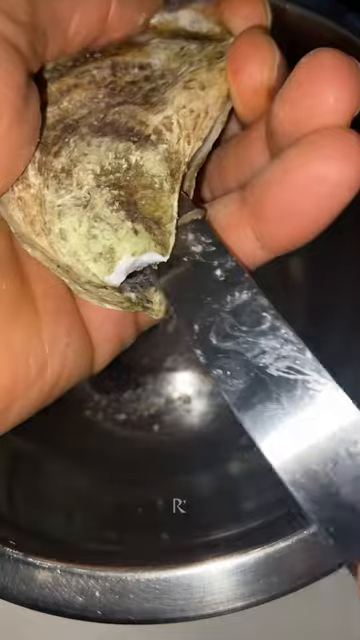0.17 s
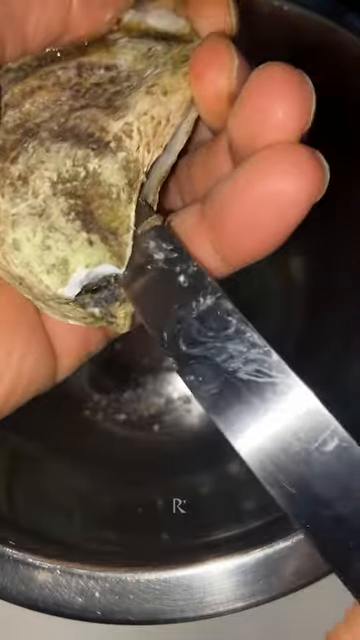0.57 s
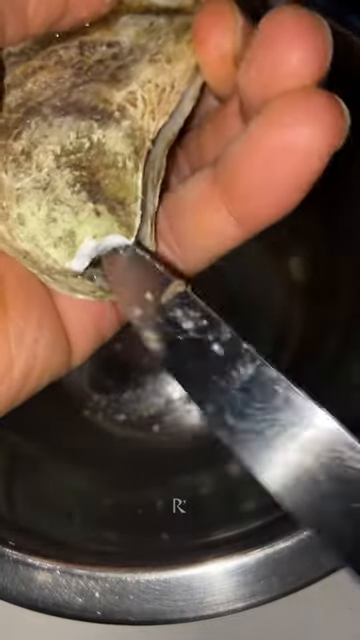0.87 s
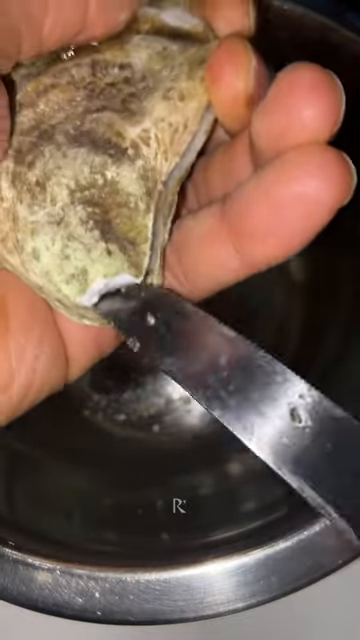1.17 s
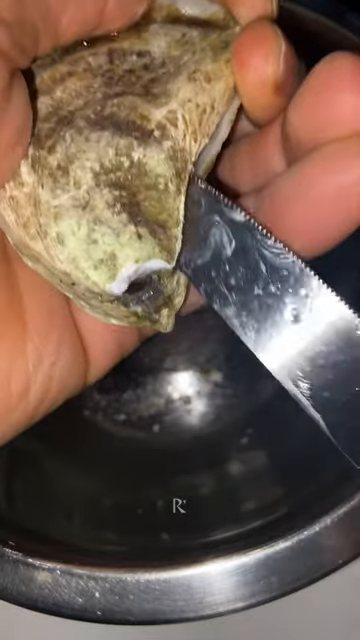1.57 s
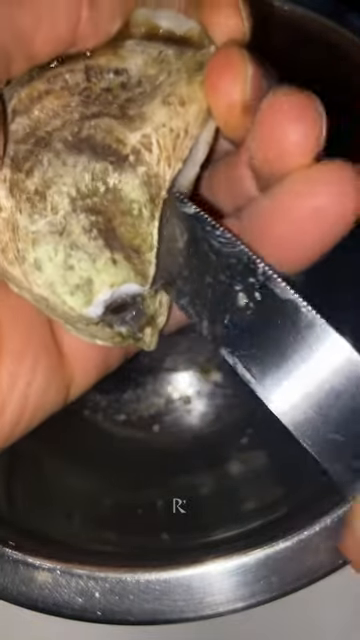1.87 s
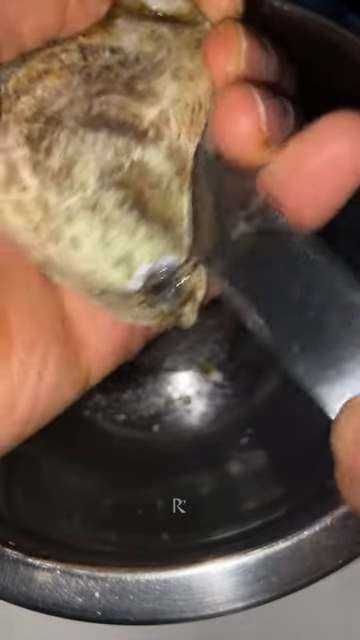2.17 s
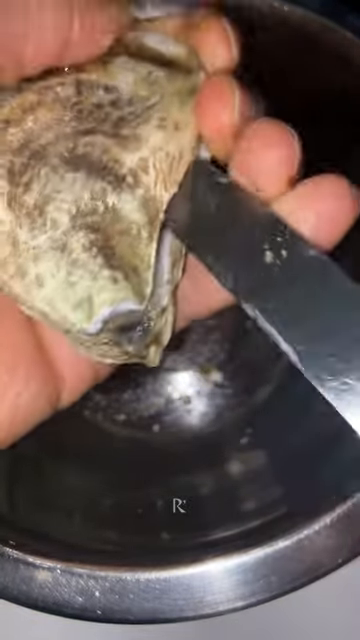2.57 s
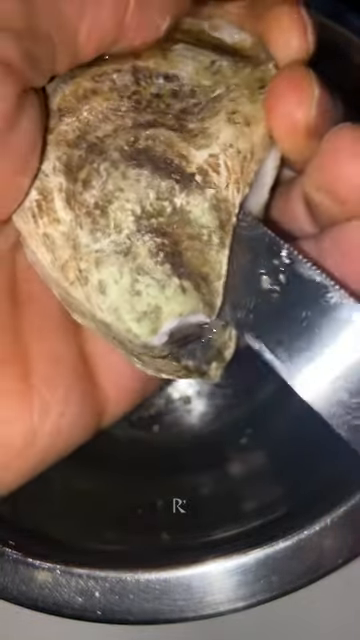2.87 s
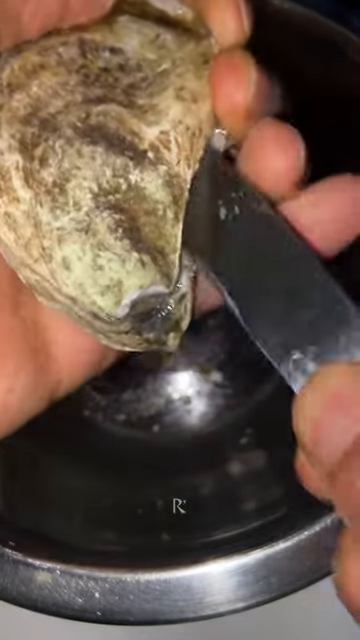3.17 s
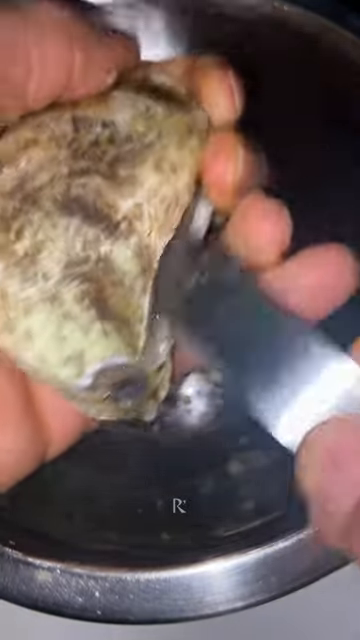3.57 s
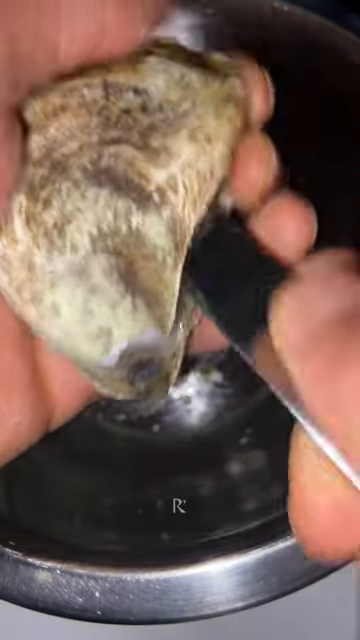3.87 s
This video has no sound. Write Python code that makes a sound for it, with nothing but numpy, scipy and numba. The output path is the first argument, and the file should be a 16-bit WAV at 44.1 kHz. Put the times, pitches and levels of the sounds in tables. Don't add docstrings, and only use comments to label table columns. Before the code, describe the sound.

Close phone pickup of an oyster being shucked over a metal bowl indoors; brittle clicks and short gritty blade scrapes come unevenly, denser and louder later, with a brief diffuse tail and quiet hiss.

```python
import sys
import numpy as np
from scipy import signal
from scipy.fft import rfft, irfft
from scipy.io import wavfile
from numba import njit

SR = 44100
rng = np.random.default_rng(int(sys.argv[2]) if len(sys.argv) > 2 else 0)


def makeup_ratio(level_db):
    decades = np.asarray(level_db, float) / 20
    return 10 ** decades


def put_to_file(sound):
    columns = np.atleast_2d(sound).T
    safe = np.clip(columns, -1, 1)
    whole_steps = np.round(safe * 32767)
    wavfile.write(sys.argv[1], SR, whole_steps.astype(np.int16))


N = 176400

# f/Hz, density/dB per Hz
RUMBLE = [(12, -62), (20, -23.5), (44, 2), (123, 5.5), (145, -19), (211, -3), (242, -14), (296, -7),
          (400, -26.5), (520, -61), (880, -120)]
AIR = [(240, 7), (400, -5), (512, -7), (666, -6), (753, -15), (1400, -16), (1760, -24), (16000, -48)]
RUMBLE_DB, AIR_DB, AIR_SIDE_DB = -44, -60, 0.5

# t/s, length/s, start level/dB, end level/dB, shell against treble/dB
SLIDES = [(0, 0.085, -90, -81, -10), (0.328, 0.08, -72, -63, -8), (0.531, 0.018, -55.5, -46, -7),
          (0.546, 0.079, -57, -49, 0.5), (0.644, 0.028, -58.5, -59, 4),
          (0.711, 0.26, -58.5, -83, 0.5), (0.883, 0.11, -35.5, -72, 3),
          (0.99, 0.09, -42.5, -50.5, 4.5), (1.055, 0.03, -48, -25.5, -5),
          (1.072, 0.019, -16, -42.5, 0), (1.094, 0.084, -50.5, -49.5, 0.5),
          (1.341, 0.025, -53.5, -50, 2), (1.493, 0.091, -48, -60, 0.5), (1.625, 0.11, -58.5, -37, -1),
          (1.787, 0.073, -56, -32, -0.5), (1.854, 0.033, -40, -55, 0), (1.918, 0.12, -45, -29, 3.5),
          (2.004, 0.14, -40, -42.5, 2), (2.156, 0.093, -70, -57, 3.5),
          (2.23, 0.16, -44, -54.5, -1), (2.462, 0.0099, -32, -29.5, 0), (2.507, 0.082, -86, -49, -5.5),
               (2.602, 0.052, -32, -43.5, -2.5), (2.717, 0.083, -52, -38.5, 1), (2.882, 0.023, -39, -36, 2),
               (2.913, 0.13, -46.5, -50, 1), (3.023, 0.019, -46.5, -27.5, 1.5), (3.05, .11, -90, -55, -1.5),
               (3.201, 0.091, -49.5, -40.5, 1), (3.294, 0.17, -52, -50, 9), (3.379, 0.047, -30, -35.5, 1.5),
               (3.43, 0.017, -36.5, -23.5, -2), (3.459, 0.23, -63.5, -59, 2.5),
               (3.619, 0.15, -36.5, -58, 1), (3.714, .15, -63, -52, 0.5), (3.856, 0.045, -68, -59, -4.5),
               (3.897, 0.095, -52.5, -36.5, -5), (3.974, 0.02, -39, -58, 2)]
SLIDE_EDGE_S, LIFT_S = 0.012, 0.0028
REST_DB, REST_FROM_S = -76, 0.5
GRIT_PER_S, GRIT_SPREAD_DB, FLUTTER_DB = 8000, 3.0, 3
GRIND_DB, GRIND_THUD_DB, GRIND_SHELL_DB, GRIND_TREBLE_DB = -22.5, 9.5, -2, 1.5
WANDER_DB, WANDER_PER_S = 5.5, 7

# t/s, peak level/dB, shell share/dB, treble share/dB
SNAGS = [(0.2575, -50.5, -6, 10), (0.5479, -26.5, -27, 6), (0.5673, -22, 1.5, -34),
         (0.609, -18.5, 7, -5), (0.7307, -36, 0.5, -1), (0.8885, -22.5, -14, 7.5),
         (0.9124, -23, -1, 5), (1.017, -14.5, 2.5, -38), (1.0714, -9, -4, -24.5), (1.0806, 0, 3, -5),
         (1.3572, -24.5, -16, -5), (1.9424, -18.5, -1, -11), (2.2383, -24, -6, 3),
         (2.2804, -12.5, 6, 0), (2.3031, -19.5, -6, 1), (2.3462, -17.5, -3, 1), (2.382, -18, -0.5, 0),
         (2.4722, -9, -2.5, -7), (2.5139, -28, 8, -5), (2.5332, -9.5, -3, -6), (2.6184, -6.5, -4.5, 3),
              (2.643, -12.5, 3, -22), (2.8765, -30, -1, 4), (2.8903, -16, -1, 0.5), (3.0385, -14, 4.5, 5.5),
              (3.0718, -24, 8.5, 6), (3.1135, -36.5, 5.5, 22), (3.27, -6.5, 2, -7), (3.3179, 5, -8.5, -10),
              (3.3877, -7, 9, -2), (3.4351, -26, 10, 13), (3.4462, -4, 3, 5.5), (3.6177, 2, -1.5, 0),
              (3.651, 1.5, -1.5, 6.5), (3.8607, 3, -12, -5.5), (3.9828, -10, -1, -7.5)]
# t/s, peak level/dB, shell share/dB, treble share/dB
TICKS = [(0.3229, -46.5, -11, 4), (0.6595, -39.5, 1, -14), (0.878, -37, -16, -3), (0.9688, -38, 6, 2),
         (1.003, -28.5, 7, -21), (1.0315, -33, 5, -9), (1.1398, -37, 0, -3.5), (1.4442, -43.5, -8, 3),
         (1.8073, -43, 0, 2), (1.8196, -28, 3.5, 0), (2.199, -37, 0.5, -5), (2.264, -23, -5, 9),
         (2.719, -41, 15, 4), (2.7459, -33, -11, 12), (2.8054, -35, -10, -5), (2.862, -48, -9, -3),
         (3.0274, -37, 16, 21), (3.0451, -32.5, 2, 12), (3.1475, -40.5, 11, 4), (3.2131, -27, -8, 8),
         (3.2229, -37, 10, 16), (3.2466, -23.5, -10, -4), (3.4038, -18, 2, 11.5), (3.5783, -39, 3.5, -2),
         (3.6346, -13, -36, -3)]
# t/s, peak level/dB
TEETH = [(1.9817, -18), (1.9913, -4.5), (2, -9.5), (2.0098, -12), (2.0203, -22), (2.0334, -22),
         (2.047, -12), (2.0531, -14.5), (2.0713, -22), (2.08, -10.5), (2.0912, -12), (2.111, -15),
         (2.1305, -6.5)]
CHIP_S, TOOTH_S, CHIP_RISE_S = 0.0022, 0.0005, 0.0006
SNAG_GAIN_DB, CHIP_SCATTER_DB = -13.5, 2.5

# f/Hz, level/dB, t60/s
THUD = [(540, -23, 0.0046), (1200, -14.5, 0.0014)]
SHELL = [(1850, -15.5, 0.02), (1971, 1, 0.025), (2320, -3, 0.018), (2800, -4.5, 0.014)]
BLADE = [(2926, -11, 0.012), (3658, -1.5, 0.01), (4170, -7, 0.011), (4750, 0, 0.0031), (5330, 0, 0.0027),
         (6030, -8.5, 0.0044)]
TREBLE = [(7000, -8.5, 0.0058), (7960, 1.5, 0.0011), (9400, -1.5, 0.0018), (10650, -10, 0.0019),
          (10240, -11.5, 0.001), (11800, -12, .003), (12240, -7, .003), (14400, -10.5, 0.0024),
          (15500, -9, .003)]
BEND_SHARES = [.05, .025, .03, .04]
BEND_PER_S = 4
LEAST_T60_S, GRIP_T60_S, BODY_CUT_HZ = 0.0055, 0.02, 1630
# t/s, lean/dB per octave
CONTACT = [(0, 0), (1.1, -7), (2.1, -5.5), (2.9, -1.5), (3.4, 8.5), (4, 20.5)]
BLADE_MIDDLE_HZ = 4300

# t/s, peak level/dB, f/Hz, t60/s
KNOCKS = [(.572, -37.5, 766, 0.021), (.61, -33.5, 1390, 0.0051), (.889, -24, 1850, 0.049),
          (0.893, -33.5, 1265, 0.02), (0.895, -29, 413, 0.0071), (1.019, -38, 980, 0.0062),
          (1.08, -40.5, 1200, 0.03), (1.142, -41, 616, 0.0039), (1.358, -46.5, 702, 0.0052),
          (2.471, -42.5, 574, 0.0046), (2.535, -35, 950, 0.0031), (2.62, -38, 445, 0.0091),
          (2.645, -35.5, 428, 0.01), (3.04, -38.5, 1340, 0.0061), (3.321, -31, 540, 0.011),
          (3.324, -35, 1160, 0.025), (3.391, -40, 1200, 0.014), (3.447, -42.5, 1060, 0.026),
          (3.62, -46, 1450, 0.018), (3.653, -35, 1280, 0.0085), (3.679, -50, 770, 0.038),
          (3.704, -53, 900, 0.044), (3.782, -55, 1270, 0.018), (3.862, -37.5, 700, 0.011),
          (3.86, -32, 1060, 0.0096), (3.983, -30, 1560, 0.026)]
KNOCK_CRUMBLE_S = 0.0023

BOWL_T60_S, BOWL_DB, BOWL_SIDE_DB = 0.064, -15.5, 1.5
# f/Hz, lead/rad
PORT_LEAD = [(1900, 0), (3050, 1.25), (3450, .15), (4900, .1), (6000, 1.1), (6800, 2.85), (8000, 3.45),
             (8900, 5.2), (10300, 6.28), (12000, 7.2), (12800, 9.1), (14200, 9.75), (15200, 11.4),
             (15900, 12.5)]
# f/Hz, level/dB
PORT_DB = [(1900, 0), (2750, -10), (3450, 4), (4200, -4), (4800, 0)]
TOP_HZ = 16400


def rms_one(x):
    return x / np.sqrt(np.mean(x ** 2) + 1e-20)


def drift(rate):
    r = np.exp(-64 * np.pi * rate / SR)
    slow = signal.lfilter([1], [1, -2 * r, r * r], rng.standard_normal(N // 32 + 1002))[1000:]
    return np.interp(np.arange(N) / 32, np.arange(len(slow)), rms_one(slow))


def coloured(spectrum):
    hz, db = np.transpose(spectrum)
    f = np.fft.rfftfreq(N, 1 / SR) + 1
    gain = makeup_ratio(np.interp(np.log(f), np.log(hz), db, -90, -90))
    return rms_one(irfft(rfft(rng.standard_normal(N)) * gain, N))


@njit
def ring(force, turn, r):
    out = np.zeros(len(force))
    for i in range(2, len(force)):
        kept = 2 * r * np.cos(turn[i]) * out[i - 1] - r * r * out[i - 2]
        out[i] = np.sin(turn[i]) * force[i - 1] + kept + 1e-18
    return out


def mode(force, hz, t60):
    turn = 2 * np.pi * hz / SR * np.ones(len(force))
    return ring(force, turn, float(makeup_ratio(-60 / (t60 * SR))))


def bodies():
    return [(g, *m) for g, group in enumerate([THUD, SHELL, BLADE, TREBLE]) for m in group]


def rumble():
    return makeup_ratio(RUMBLE_DB) * coloured(RUMBLE)


def air():
    no_bass = signal.butter(4, 450, "high", fs=SR, output="sos")
    side = makeup_ratio(AIR_DB + AIR_SIDE_DB) * signal.sosfilt(no_bass, coloured(AIR))
    middle = makeup_ratio(AIR_DB) * coloured(AIR)
    return middle, side


def pressure():
    t, power = np.arange(N) / SR, np.zeros((3, N))
    for s, length, db0, db1, tilt_db in SLIDES:
        near = slice(max(int((s - SLIDE_EDGE_S) * SR), 0), int((s + length + SLIDE_EDGE_S) * SR))
        inside = np.minimum(t[near] - s, s + length - t[near])
        edge = np.clip(inside / SLIDE_EDGE_S + 0.5, 0, 1)
        level = makeup_ratio(np.interp(t[near], [s, s + length], [db0, db1]))
        tilt = makeup_ratio(tilt_db * np.array([[1], [0], [-1]]))
        power[:, near] += (edge * level * tilt) ** 2
    fade = np.exp(-1 / (LIFT_S * SR))
    resting = makeup_ratio(2 * REST_DB) * (t > REST_FROM_S)
    return np.sqrt(signal.lfilter([1 - fade], [1, -fade], power) + resting)


def grinding():
    press = pressure()
    size = makeup_ratio(GRIT_SPREAD_DB * np.minimum(rng.exponential(1, N), 5))
    grains = size * (rng.random(N) < GRIT_PER_S / SR)
    grit = rms_one(grains * makeup_ratio(FLUTTER_DB * drift(rate=58)))
    pushes = grit * rng.standard_normal((3, N))
    shares = [GRIND_THUD_DB, GRIND_SHELL_DB, 0, GRIND_TREBLE_DB]
    forces = []
    for k, (g, hz, db, t60) in enumerate(bodies()):
        gain = makeup_ratio(db + shares[g] + WANDER_DB * drift(WANDER_PER_S))
        forces.append(pushes[k % 3] * press[max(g - 1, 0)] * gain)
    return makeup_ratio(GRIND_DB) * np.array(forces)


def snags():
    chips = SNAGS
    rows = np.array(chips + TICKS + [(s, db, 0, 0) for s, db in TEETH])
    s, peak_db, shell_db, treble_db = rows.T
    crumble_s = np.where(np.arange(len(rows)) < len(chips), CHIP_S, TOOTH_S)[:, None, None]
    at, modes, lag = (s * SR).astype(int), bodies(), np.arange(400)
    shape = np.exp(-lag / (crumble_s * SR)) * np.tanh(lag / (CHIP_RISE_S * SR))
    burst = rng.standard_normal((len(rows), 3, len(lag))) * shape
    burst = burst / np.sqrt(np.sum(burst ** 2, axis=2, keepdims=True))
    shares = [shell_db, shell_db, 0 * s, treble_db]
    luck = rng.standard_normal((len(rows), len(modes)))
    force = np.zeros((len(modes), N + len(lag)))
    for k, (g, hz, db, t60) in enumerate(modes):
        gain = makeup_ratio(peak_db + shares[g] + db + SNAG_GAIN_DB + CHIP_SCATTER_DB * luck[:, k])
        np.add.at(force[k], at[:, None] + lag, burst[:, k % 3] * gain[:, None])
    return force[:, :N]


def strike(forces):
    lean_db = np.interp(np.arange(N) / SR, *np.transpose(CONTACT))
    rung = []
    for k, (force, (g, hz, db, t60)) in enumerate(zip(forces, bodies())):
        if g == 2:
            force = force * makeup_ratio(lean_db * np.log2(hz / BLADE_MIDDLE_HZ))
        pitch = hz * (1 + BEND_SHARES[g] * drift(BEND_PER_S))
        rung.append(mode(force, pitch, np.clip(t60, LEAST_T60_S, GRIP_T60_S)) * (-1) ** k)
    cut = signal.butter(4, BODY_CUT_HZ, "high", fs=SR, output="sos")
    return sum(rung[:len(THUD)]) + signal.sosfilt(cut, sum(rung[len(THUD):]))


def knocks():
    out, lag = np.zeros(N + 3000), np.arange(3000)
    crumbs = rng.standard_normal((len(KNOCKS), len(lag))) * np.exp(-lag / (KNOCK_CRUMBLE_S * SR))
    for (s, db, hz, t60), crumb in zip(KNOCKS, crumbs):
        push = np.convolve(crumb / np.linalg.norm(crumb), np.hanning(12) / 2)[:len(lag)]
        out[int(s * SR) + lag] += makeup_ratio(db) * mode(push, hz, np.clip(t60, 0.004, 0.05))
    return out[:N]


def bowl(x):
    t = np.arange(int(0.25 * SR)) / SR
    tail = rng.standard_normal((2, len(t))) * makeup_ratio(-60 * t / BOWL_T60_S) * (t > 0.003)
    tail = makeup_ratio(BOWL_DB) * tail / np.sqrt(np.sum(tail ** 2, axis=1, keepdims=True))
    return signal.fftconvolve(x[None], tail, axes=1)[:, :N]


def ports(x):
    f = np.fft.rfftfreq(N, 1 / SR)
    lead = np.interp(f, *np.transpose(PORT_LEAD))
    half = np.exp(0.5j * lead) * makeup_ratio(np.interp(f, *np.transpose(PORT_DB)) / 2)
    return irfft(rfft(x) * np.array([half, 1 / half]), N)


def scene():
    knife = strike(grinding() + snags()) + knocks()
    tail, tail_side = bowl(knife)
    hiss, hiss_side = air()
    side = hiss_side + makeup_ratio(BOWL_SIDE_DB) * tail_side
    return ports(knife + tail + hiss) + side * np.array([[1], [-1]]) + rumble()


def low_pass(x):
    return signal.sosfilt(signal.butter(12, 17150, fs=SR, output="sos"), x)


def record(dry):
    top_cut = signal.cheby2(8, 30, TOP_HZ, fs=SR, output="sos")
    mix = signal.sosfilt(top_cut, dry)
    return low_pass(mix)


dry = scene()
out = record(dry)
put_to_file(out)
```